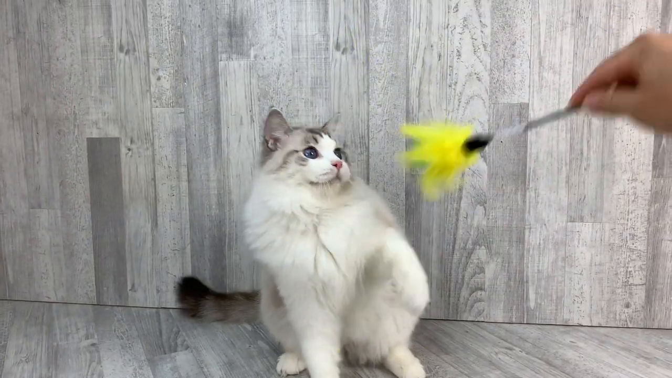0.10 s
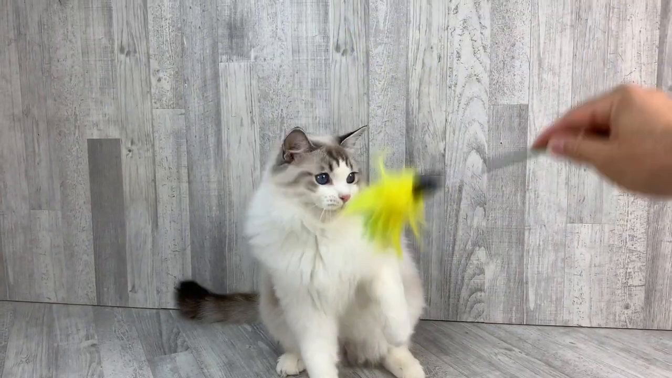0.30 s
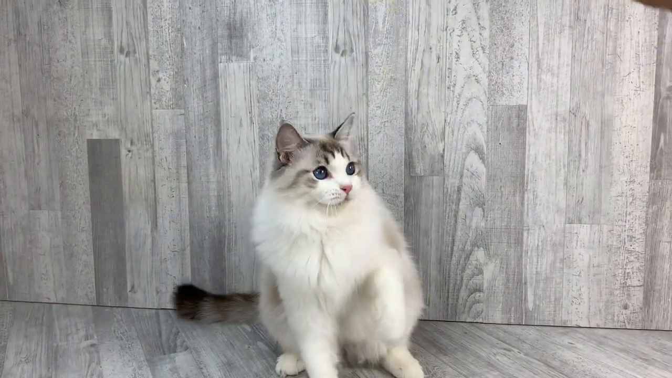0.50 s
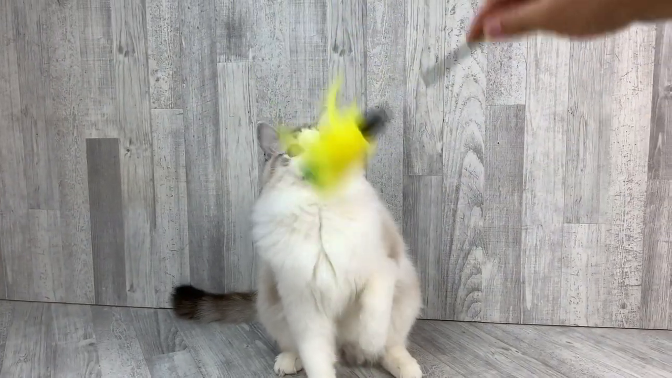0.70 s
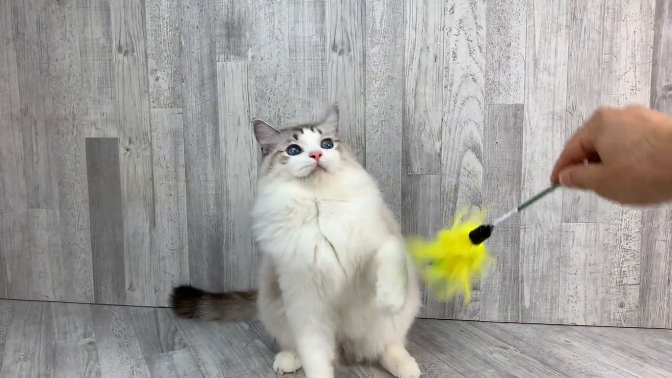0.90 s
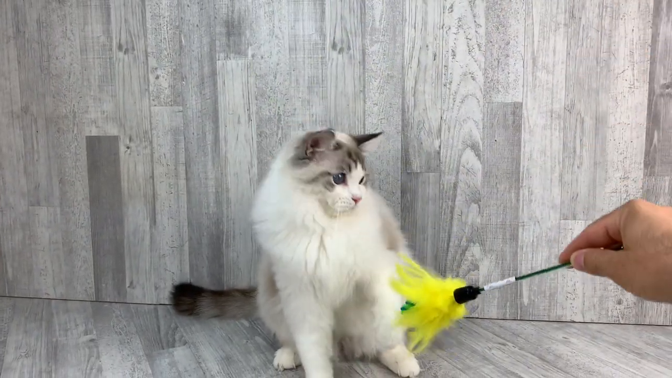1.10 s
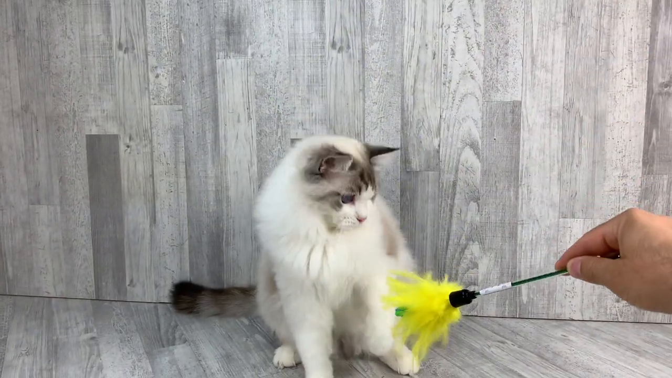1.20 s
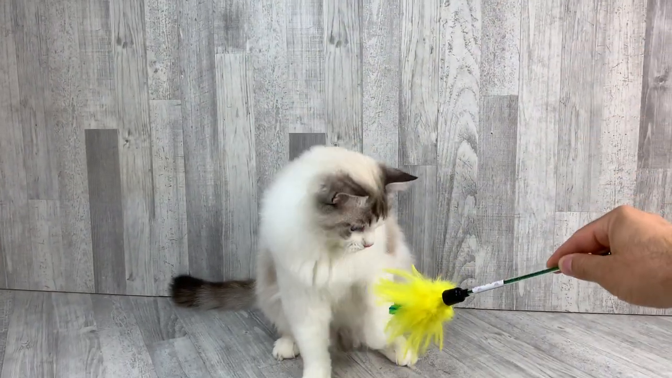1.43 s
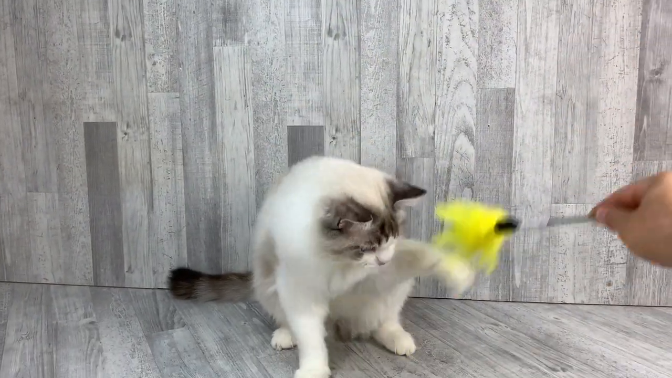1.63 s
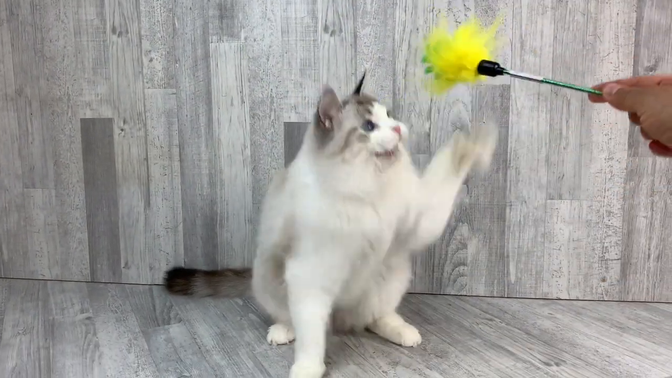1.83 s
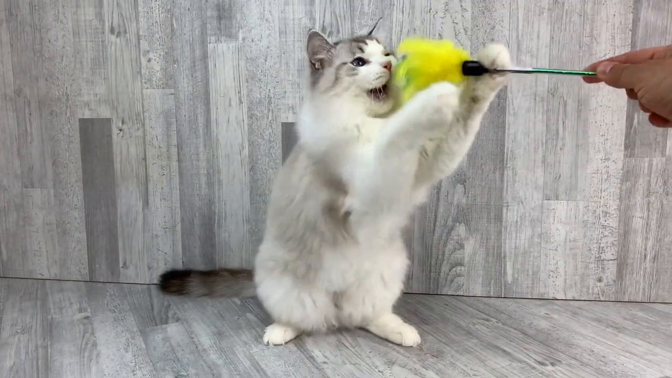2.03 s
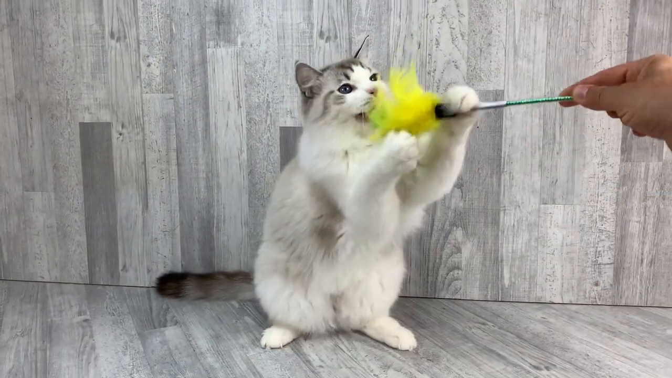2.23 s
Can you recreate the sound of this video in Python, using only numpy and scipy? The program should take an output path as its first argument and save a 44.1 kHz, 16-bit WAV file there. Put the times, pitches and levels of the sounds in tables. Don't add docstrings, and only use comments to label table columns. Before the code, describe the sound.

Loose plastic parts clack and tick brightly in quick uneven swings, stop briefly, then resume; short rough room echoes follow each hit, with very faint hum and soft cat paw thuds underneath, heard close on a phone.

```python
import sys
import numpy as np
from scipy import signal
from scipy.fft import rfft, irfft
from scipy.io import wavfile

SR = 44100
rng = np.random.default_rng(int(sys.argv[2]) if len(sys.argv) > 2 else 0)


def boost_factor(decibels):
    exponent = np.asarray(decibels, float) / 20
    return 10 ** exponent


def output_pcm(signal):
    pcm = np.clip(np.atleast_2d(signal).T, -1, 1) * 32767
    wavfile.write(sys.argv[1], SR, np.round(pcm).astype(np.int16))


N = 101430


def evened(x):
    return x / np.sqrt(np.mean(x ** 2) + 1e-20)


def read(points, hz):
    f, value = np.transpose(points)
    return np.interp(np.log(hz + 1), np.log(f + 1), value)


def humps(table, hz):
    return sum(boost_factor(db) / (1 + ((hz - f) / width * 2) ** 2) for f, width, db in table)


def coloured(gain):
    return evened(irfft(rfft(rng.standard_normal((2, N))) * gain, N))


# f/Hz, density/dB per Hz
HISS_SPECTRUM = [(150, 2.5), (350, 2.5), (550, -8.5), (2500, -15), (5500, -26), (8000, -21), (11000, -26.5),
                 (15500, -24.5)]
# f/Hz, width/Hz, level/dB
RUMBLE_PEAKS = [(50, 40, -5), (88, 30, -8), (167.5, 59, -1)]
# t/s, level/dB
MOTOR_LOAD = [
    (0, -95),
    (.82, -95),
    (.92, -76),
    (1.45, -76),
    (1.6, -68),
    (1.8, -62),
    (1.95, -65),
    (2.15, -72),
    (2.3, -67),
]
HISS_DB, RUMBLE_DB = -76.5, -71
HUM_HZ, WANDER_HZ, WAVER_DB, FIFTH_DB = 106.5, 3, 3.5, -2


def background():
    hz, t = np.fft.rfftfreq(N, 1 / SR), np.arange(N) / SR
    hiss = boost_factor(HISS_DB) * coloured(boost_factor(read(HISS_SPECTRUM, hz)) * (hz > 180))
    rumble = boost_factor(RUMBLE_DB) * coloured(humps(RUMBLE_PEAKS, hz))
    wander, waver = coloured(humps([(0.035, 5.4, 0)], hz))
    phase = 2 * np.pi * np.cumsum(HUM_HZ + WANDER_HZ * wander) / SR
    hum = np.sqrt(2) * np.sin(phase) * boost_factor(WAVER_DB * waver)
    fifth = boost_factor(FIFTH_DB) * coloured(humps([(1.5 * HUM_HZ, 14, 0)], hz))
    load = boost_factor(np.interp(t, *np.transpose(MOTOR_LOAD)))
    return hiss + rumble + load * (hum + fifth)


MODE_SPREAD_DB, DETUNE = 3, .035


def ring(modes, t, luck):
    hz, width_hz, db = np.transpose(modes)[:, :, None]
    detune, phase, favour = luck[:3 * len(modes)].reshape(3, -1, 1)
    turn = 2 * np.pi * (hz * (1 + DETUNE * detune) * t + phase)
    level = boost_factor(db + MODE_SPREAD_DB * favour)
    out = (level * np.exp(-np.pi * width_hz * t) * np.sin(turn)).sum(0)
    return out * np.minimum(t / 0.000095, 1) / abs(out).max()


# f/Hz, width/Hz, level/dB
TICK_MODES = [(7960, 3070, -0.5), (8980, 1210, -4), (10710, 2450, 28.5), (12040, 4500, 9),
              (14900, 730, -15.5)]
# f/Hz, width/Hz, level/dB
STEM_MODES = [(2303, 540, -7), (3040, 450, -14), (3900, 278, -14), (5076, 730, -4.5), (5570, 2100, 3.5),
              (5930, 2230, -1)]
# ratio to pitch, width/Hz, level/dB
SHELL_MODES = [(.55, 140, -7), (1, 130, 0), (1.55, 240, -7), (2.0, 300, -5), (2.6, 400, -10)]
TICK_DB, STEM_DB, SHELL_DB = 7, 5, -0.5
TICK_GAP_S, TICK_SPREAD_DB, FADE_DB_PER_MS = .0008, 3, -2.2
GRAZE_DB = -4
TILT, EVEN_DB = .3, -8


def clack(peak_db, shell_db, stem_db, shell_hz, luck):
    t, out = np.arange(900) / SR, np.zeros((2, 2400))
    tick_t = t[:300]
    at_s = np.cumsum(TICK_GAP_S * (1 + .6 * np.tanh(luck[0, :, 0])))
    at_s = at_s - at_s[0]
    size_db = FADE_DB_PER_MS * at_s * 1000 + GRAZE_DB * (at_s == 0)
    size_db = size_db + TICK_SPREAD_DB * np.tanh(luck[0, :, 1]) * (at_s > 0)
    size = boost_factor(size_db)
    shell = np.array(SHELL_MODES) * [shell_hz, 1, 1]
    stem = np.array(STEM_MODES, float)
    tilt = np.clip(TILT * (shell_db - stem_db - EVEN_DB), -9, 9)
    stem[:, 2] -= np.log2(stem[:, 0] / 4000) * tilt
    for c in range(2):
        knock = ring(shell, t, .25 * luck[0, 0, 35:] + .2 * luck[c, 1, 35:])
        out[c, :len(t)] += boost_factor(SHELL_DB + shell_db) * knock
        for k, s in enumerate(at_s):
            body = .7 * luck[0, 0, 2:] + .7 * luck[c, k, 2:]
            edge_hit = boost_factor(TICK_DB) * ring(TICK_MODES, tick_t, body)
            stem_hit = boost_factor(STEM_DB + stem_db) * ring(stem, tick_t, body[15:])
            n = round(s * SR)
            out[c, n:n + len(tick_t)] += size[k] * (edge_hit + stem_hit)
    return boost_factor(peak_db) * out


# t/s, peak/dB, shell/dB re peak, stem/dB re peak, shell f/Hz
FIRST_BOUT = [(0.0515, -29.5, -29, -39, 1180), (0.073, -33.5, -55, -28, 1180), (0.159, -15, -24, -19, 1720),
              (0.2319, -5, -19, -11, 1578), (0.3015, -5, -29.5, -15.5, 1880),
              (0.3654, -0.5, -68, -15.5, 1780), (0.3703, -10, -31, -27, 1165),
              (0.4273, -12, -27.5, -45, 1670), (0.5082, -1.5, -25.5, -22.5, 1648),
              (0.5619, -11, -25, -18.5, 670), (0.6346, -2, -35.5, -11, 1575),
              (0.7056, 1, -22.5, -19.5, 1700), (0.7256, -13.5, -51, -36.5, 866),
              (0.7745, -4.5, -21, -48, 1360), (0.85, -17, -45, -18.5, 1560),
              (0.9602, -13, -34.5, -14.5, 690), (1.0232, -3.5, -33, -34.5, 1678),
              (1.066, -15.5, -32.5, -21, 1343), (1.129, -24, -22, -29, 853), (1.1568, -27.5, -37, -21, 972)]
# t/s, peak/dB, shell/dB re peak, stem/dB re peak, shell f/Hz
SECOND_BOUT = [(1.6772, -25, -28, -34, 877), (1.706, -27, -26, -31, 668),
               (1.736, -26.5, -19.5, -18.5, 1380), (1.8108, -1.5, -33, -24, 1213),
               (1.8314, -30, -6.5, 0.5, 1240), (1.8806, -2.5, -23.5, -11, 1224),
               (1.946, -8, -37, -15.5, 1100), (1.9681, -19, -56, -32, 1250),
               (1.9862, -0.5, -30.5, -22, 1105), (2.0306, -6.5, -17, -11, 1227),
               (2.1342, -22, -41, -17, 930), (2.2303, -15, -29.5, -33.5, 1130)]
BEFORE_DB, STRAY_S, STRAY_DB = -46, 1.292, -60
THIN_HZ = 720


def toy():
    ring_out = (0, BEFORE_DB, -25, -12, 1100)
    stray = (STRAY_S, STRAY_DB, -35, -18, 1100)
    rows = list(FIRST_BOUT) + list(SECOND_BOUT) + [ring_out, stray]
    luck = rng.standard_normal((len(rows), 2, 16, 50))
    mix = np.zeros((3, 2, N + 2400))
    for k, (s, *rest) in enumerate(rows):
        n = round(s * SR)
        mix[k % 3, :, n:n + 2400] += clack(*rest, luck[k])
    thin = signal.butter(3, THIN_HZ, "high", fs=SR, output="sos")
    return signal.sosfilt(thin, mix[..., :N])


# f/Hz, t60/s
ROOM_T60 = [(400, .28), (1300, .25), (3500, .24), (9000, .22), (15000, .21)]
# f/Hz, level/dB
TAIL_COLOUR = [(400, -0.5), (1500, -1), (5000, 2.5), (11000, -5.5), (15400, 4), (16100, -33)]
ROOM_DB, FIRST_ECHO_S, CLUMP_DB = -1, 0.0016, 3


def room(x):
    size = SR // 2
    slots = np.arange(0, size - 12, 12)
    shape = (6, len(slots))
    taps = np.zeros((6, size))
    np.put_along_axis(taps, slots + rng.integers(0, 12, shape), rng.standard_normal(shape), 1)
    clumps = np.repeat(rng.standard_normal((3, size // 40 + 1)), 40, axis=1)[:, :size]
    taps = taps * boost_factor(CLUMP_DB * np.repeat(clumps, 2, axis=0))
    hz, t, z = signal.stft(taps, SR, nperseg=128)
    decay_db = -60 * t / read(ROOM_T60, hz)[:, None]
    colour_db = read(TAIL_COLOUR, hz)[:, None]
    tail = signal.istft(z * boost_factor(decay_db + colour_db), SR, nperseg=128)[1]
    tail = tail * np.clip(np.arange(tail.shape[1]) / SR / FIRST_ECHO_S - .5, 0, 1)
    tail = tail / np.linalg.norm(tail, axis=1, keepdims=True)
    return signal.fftconvolve(x, tail.reshape(3, 2, -1), axes=2)[..., :N].sum(0)


# t/s, level/dB, f/Hz
PAW_THUDS = [(1.89, -59, 47), (1.9, -66, 370), (1.97, -61, 64), (1.97, -62, 240), (2.04, -60, 310),
             (2.2, -61, 70), (.35, -69, 42), (.3, -70, 280), (.77, -70, 48), (1.58, -63, 170),
             (.09, -68, 172), (1.98, -61, 160)]
PAW_RISE_S, PAW_T60_S = .05, .35


def paws():
    hz, t, out = np.fft.rfftfreq(N, 1 / SR), np.arange(N) / SR, 0
    for s, db, f in PAW_THUDS:
        u = np.maximum(t - s + PAW_RISE_S, 0)
        board = np.sin(2 * np.pi * f * u) * (f < 200)
        scuff = .5 * coloured(humps([(f, .5 * f, 0)], hz))
        rise = np.minimum(u / PAW_RISE_S, 1) ** 2
        fall = boost_factor(db - 60 * np.maximum(u - PAW_RISE_S, 0) / PAW_T60_S)
        out = out + (board + scuff) * rise * fall
    return out


def scene():
    hits = toy()
    return hits.sum(0) + boost_factor(ROOM_DB) * room(hits) + background() + paws()


def low_pass(x):
    return signal.sosfilt(signal.butter(12, 17030, fs=SR, output="sos"), x)


# f/Hz, correlation
PORT_LIKENESS = [(40, .97), (150, .92), (400, .75), (1000, .35), (1600, .1), (6000, .15), (7100, .75),
                 (7900, .985)]
# f/Hz, level/dB
RIGHT_PORT = [(300, 0), (1100, -2.5), (2500, 0), (4000, .5), (5200, 5), (6600, 0)]
LEAD_S, IN_STEP_HZ, LEAD_FROM_HZ = .000204, 10950, 6050
EDGE_HZ, EDGE_DB, TOP_HZ = 15800, -6, 16850
CEILING = .95


def record(dry):
    hz = np.fft.rfftfreq(N, 1 / SR)
    a, b = rfft(dry / (1 + (dry / CEILING) ** 6) ** (1 / 6))
    same = np.clip(read(PORT_LIKENESS, hz), 0, 1)
    lead = np.exp(2j * np.pi * (np.maximum(hz, LEAD_FROM_HZ) - IN_STEP_HZ) * LEAD_S)
    right = (same * lead * a + np.sqrt(1 - same ** 2) * b) * boost_factor(read(RIGHT_PORT, hz))
    corners_hz = [EDGE_HZ - 150, EDGE_HZ + 150, TOP_HZ - 200, TOP_HZ + 250]
    edge = boost_factor(np.interp(hz, corners_hz, [0, EDGE_DB, EDGE_DB, -80]))
    return low_pass(irfft(np.array([a, right]) * edge, N))


dry = scene()
out = record(dry)
output_pcm(out)
```